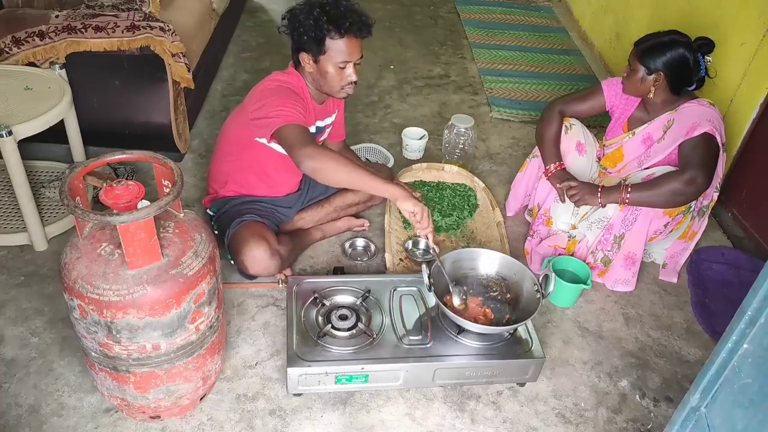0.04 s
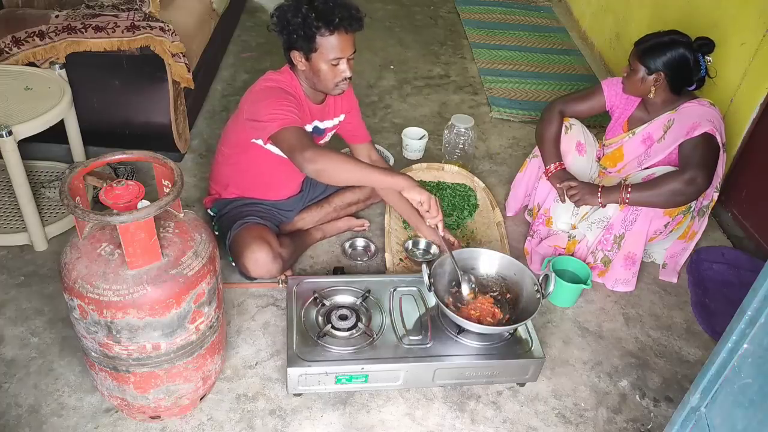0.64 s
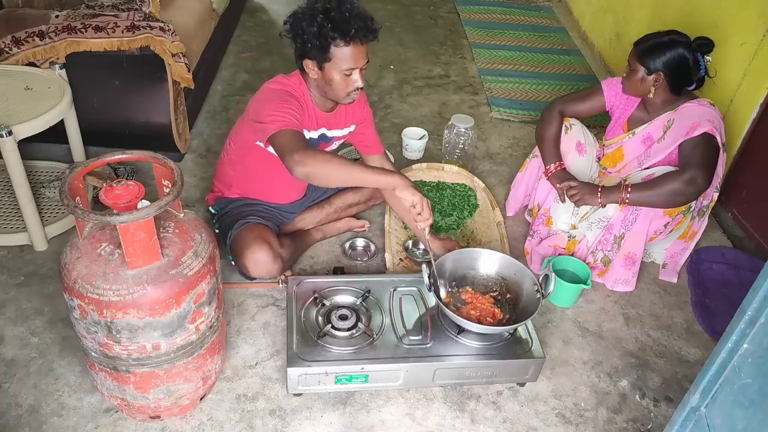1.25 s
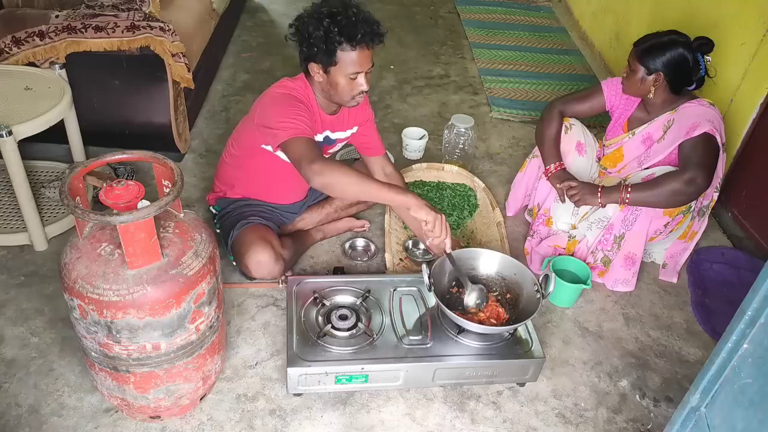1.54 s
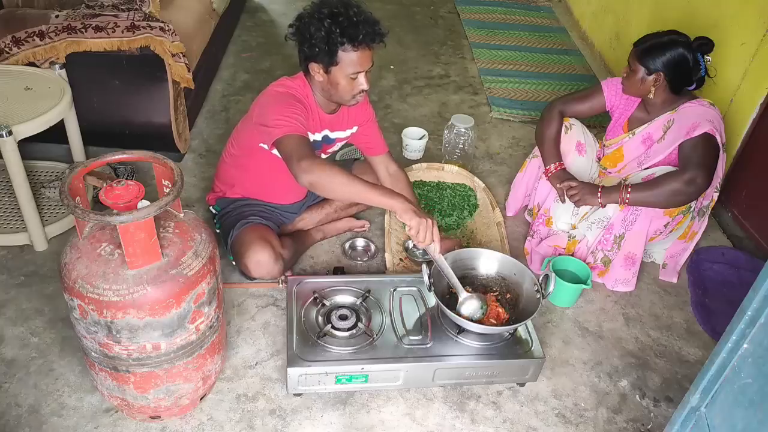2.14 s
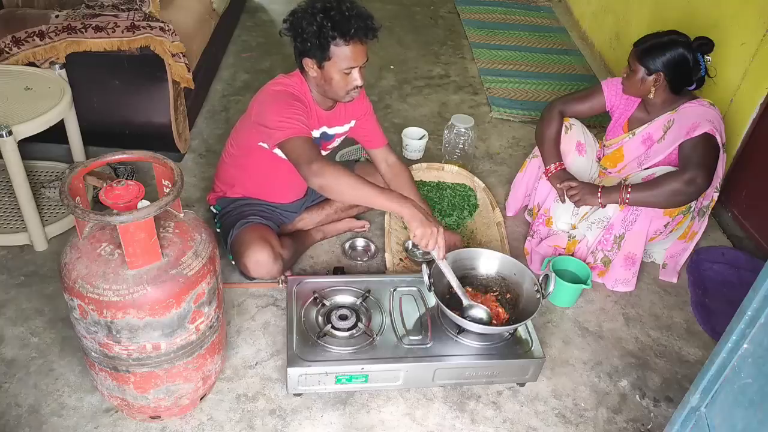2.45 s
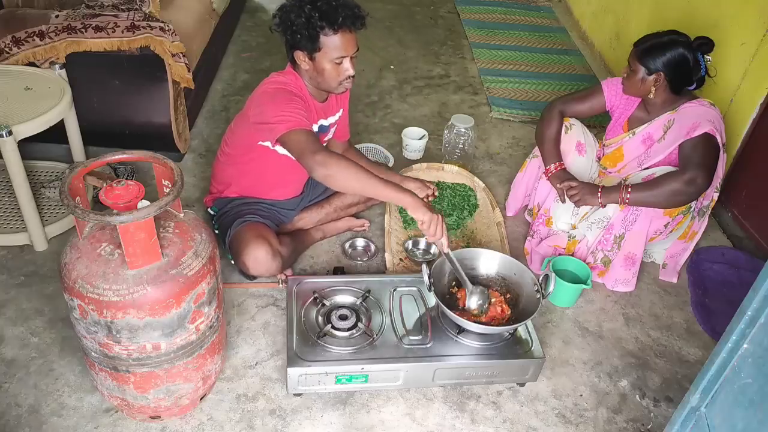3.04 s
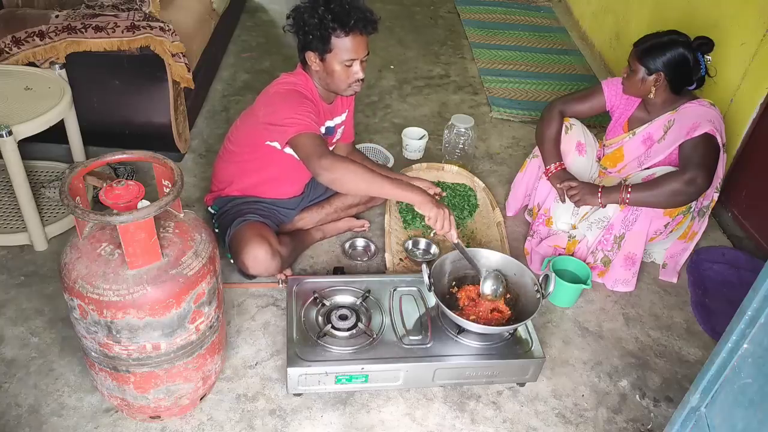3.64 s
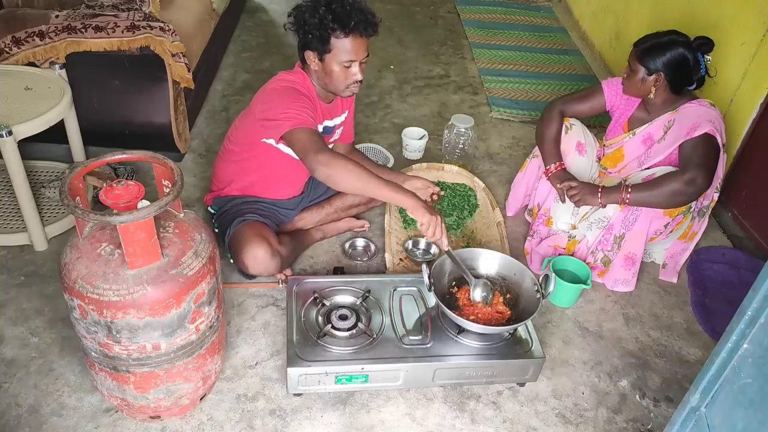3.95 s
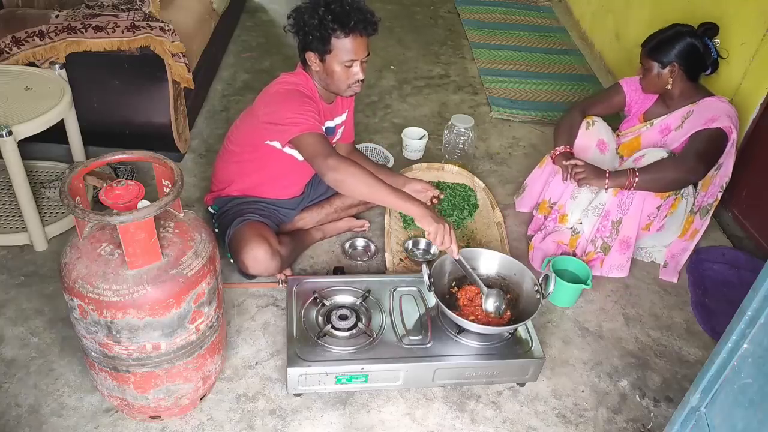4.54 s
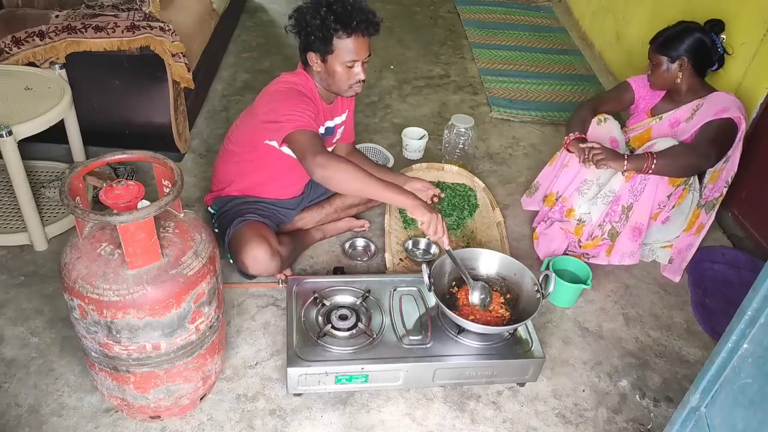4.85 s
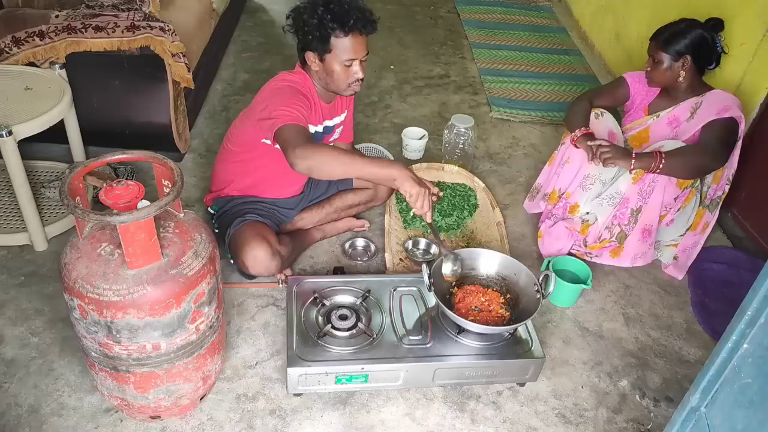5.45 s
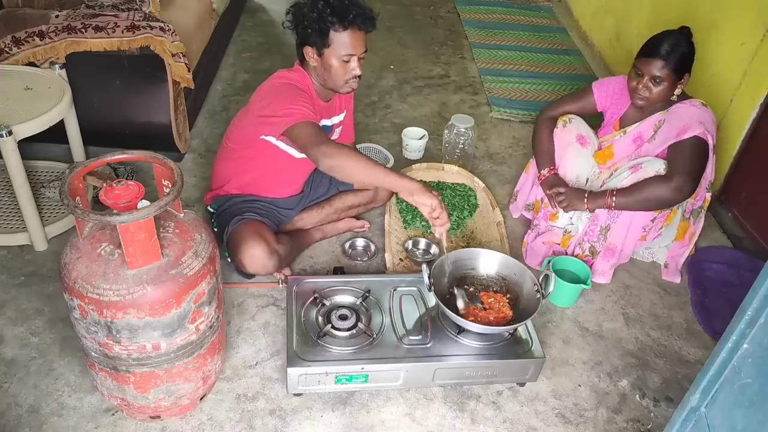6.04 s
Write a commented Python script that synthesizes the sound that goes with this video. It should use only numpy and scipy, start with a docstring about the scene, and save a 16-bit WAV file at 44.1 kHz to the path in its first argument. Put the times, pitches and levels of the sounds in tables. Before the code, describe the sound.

Heard from nearby in a bare room, chopped tomatoes sizzle softly in hot oil over the faint rumble and hiss of a gas burner. A few ringing ladle clanks and skids on the wok open the scene, with faint bird chirps outside. A run of duller chopping knocks and rubs follows while the frying grows louder. It ends with two sharp clanks and scrapes that make the light stove thump.

```python
"""A metal ladle clanks on a steel wok over the soft sizzle of chopped tomatoes, in a bare room.
Each clank rings the wok's modes, then the ladle skids down the wall, sticking and slipping.
Chops through the tomatoes knock more dully; the last two clanks also jolt the stove.
Water bursts out of the hot oil in tiny pops, swelling once the food is stirred.
Behind it the gas burner rumbles and hisses, and a far bird chirps."""
import sys
import numpy as np
from scipy import signal
from scipy.fft import rfft, irfft, next_fast_len
from scipy.io import wavfile

SR = 44100
rng = np.random.default_rng(int(sys.argv[2]) if len(sys.argv) > 2 else 0)


def bounce(signal):
    """Save signal as a 16-bit WAV file at the path given by the first command-line argument."""
    frames = np.transpose(np.atleast_2d(signal))
    limited = np.clip(frames, -1, 1)
    pcm = np.round(limited * 32767).astype(np.int16)
    wavfile.write(sys.argv[1], SR, pcm)


N = 277830

# ladle on bare steel:
# (time [s], level [dB], brightness [dB/oct], crack [dB], travel to the food [s], skid [dB])
CLANKS = [(0.092, -31, -1.47, -30, 0.1, -59), (0.380, -25.5, 0, -8, 0.17, -44),
          (1.275, -30, 1, -15, .23, -40.5), (5.5297, -21, 2.2, -14, .18, -37),
          (5.963, -22.5, 2, -13, .205, -37)]
# ladle through tomato: (time [s], level [dB], brightness [dB/oct], crack [dB])
CHOPS = [(2.842, -44.5, -1.5, -38), (3.131, -31.8, 0.64, -37), (3.350, -41.5, -1.1, -37),
         (3.565, -40.5, 0.5, -34), (3.980, -25, 1.3, -1), (4.193, -36.5, 0.5, -14.5), (4.408, -28, 2, -21),
         (4.605, -29.5, 1.35, -37), (4.828, -42.5, -3, -16.5)]
# gentle pushes through the food: (time [s], length [s], level [dB], brightness [dB/oct])
PUSHES = [(2.36, 0.19, -51.5, -7.5), (2.55, 0.041, -43.5, -0.5), (3.761, 0.067, -50.5, -5.5),
          (5.017, .063, -44, -6.5), (5.235, 0.069, -45, -3.5)]
# four registers of a blow: (low [Hz], high [Hz])
ZONES_HZ = [(150, 1000), (1000, 2500), (2500, 8500), (8500, 14000)]
# level offset per register: (body [dB], clang [dB], ring [dB], edge [dB])
CLANK_ZONES_DB = [-3, 4.5, 2.5, -4]
CHOP_ZONES_DB = [6.5, -0.5, 2.34, -6.5]
# distinct wok modes: (frequency [Hz], relative level [dB], t60 [s])
WOK_MODES = [(207, 0, .4), (241, -3, .35), (281, -4, .3), (307, 0, .4), (438, 0, .35), (578, 0, .35),
             (660, -4, .3), (711, -2, .35), (853, -3, .35), (955, -2, .35), (1088, -3, .3), (1294, -2, .3),
             (1385, -3, .28), (1563, -1, .26), (1761, -2, .3), (2035, -1, .26), (3050, -6, .25),
             (3600, -1, .3), (5520, -4, .22), (6228, -1, .25), (6995, -3, .26), (7243, -3, .3),
             (7590, -4, .22), (8521, 0, .25), (9108, 0, .22), (9450, -2, .18), (10480, -2, .2),
             (11303, 0, .22), (12100, -2, .2)]
# stove jolts: (time [s], level [dB])
THUMPS = [(5.532, -20), (5.964, -36)]
# spectral shapes: (frequency [Hz], relative level [dB])
CLANK_COLOUR = [(150, -24), (210, -12), (290, -5), (370, -9), (450, -5), (520, -9), (680, -3), (1100, -7),
                (1550, 2), (2000, 1), (2750, -12), (3650, -8), (4700, -12), (7400, -7), (9000, -14),
                (14000, -21)]
CHOP_COLOUR = [(150, -16), (205, -6), (295, -1), (370, -6), (440, 0), (520, -5), (600, 1), (780, -3),
               (1000, -2), (1600, -7), (2500, -11), (3500, -13), (4400, -19), (7400, -13), (9000, -20),
               (14000, -26)]
OIL_COLOUR = [(60, -54), (300, -2), (600, -2.5), (1000, 2), (1250, 4), (1700, 1.5), (2200, 5), (3600, 3),
              (5000, 1), (7400, 3.5), (8800, -2.5), (12000, 0), (14300, -4.5)]
FLAME_COLOUR = [(5, -2), (22, 1.5), (45, -13), (70, -13.5), (95, -14), (150, -20.5), (230, -25),
                (300, -22.5), (370, -29.5), (700, -28), (1000, -46.5), (2200, -35.5), (4500, -47),
                (10000, -75)]
# gas jet resonances: (frequency [Hz], width [Hz], level [dB])
JET_BANDS = [(7550, 130, -62), (7280, 200, -60), (3840, 610, -65.5)]
# bird: (time [s], length [s], start [Hz], end [Hz], level [dB])
CHIRPS = [(0.275, .06, 3250, 4400, -53), (0.315, .06, 4400, 4150, -55), (0.53, .07, 3700, 4300, -57),
          (1.02, .09, 6300, 5650, -61), (1.625, .09, 4750, 3200, -54)]
# left-right likeness: (frequency [Hz], correlation [-1..1])
WOK_LIKENESS = [(100, 0.52), (300, 1), (600, 0.17), (1100, 0.42), (2200, -0.28), (4500, -0.2), (8000, 0.37),
                (14000, 0.26)]
AIR_LIKENESS = [(60, 0.36), (300, 0.54), (650, 0.46), (1300, 0.031), (14000, -0.1)]
# stereo balance: (frequency [Hz], left minus right [dB])
BALANCE = [(60, 1), (150, -0.5), (300, 0.5), (650, -0.5), (1200, -2), (2300, 0), (4300, -1), (8000, -2),
           (14000, -0.1)]
# decay of the wok's crowded modes and of the room: (frequency [Hz], t60 [s])
PLATE_T60 = [(200, 0.16), (700, 0.086), (1700, 0.086), (4000, 0.096), (7500, 0.11), (14000, 0.076)]
ROOM_T60 = [(150, 0.53), (600, 0.75), (1800, 0.47), (4000, 0.5), (7500, 0.47), (14000, 0.21)]

RING_SAMPLES = 2 ** 15
RING_TIME_S, RING_BINS_HZ = np.arange(RING_SAMPLES) / SR, np.fft.rfftfreq(RING_SAMPLES, 1 / SR)
EDGES_HZ = 160 * 2 ** (np.arange(21) / 3)
CENTRES_HZ = np.sqrt(EDGES_HZ[1:] * EDGES_HZ[:-1])
BANK = [signal.butter(2, pair, "band", fs=SR, output="sos") for pair in zip(EDGES_HZ, EDGES_HZ[1:])]


def blows(table, colour, zones_db, room, modes, wet_db, chatter_s, chatter_db, t60_scale, patchy_db):
    """Ladle strikes wok: a crack, a short crash of crowded modes, clear modes ringing on."""
    out = np.zeros((2, N))
    plates = np.array([crowded_modes(np.array(PLATE_T60) * [1, t60_scale]) for _ in range(3)])
    octaves = np.log2(ZONES_HZ).mean(axis=1) - np.log2(ZONES_HZ).mean()
    ring_db, spread_db, crack_lag_s = -14, -3, .001087
    for time_s, level_db, brightness_db_oct, crack_db, *_ in table:
        # each spot excites another blend of modes
        plate = np.tensordot(rng.standard_normal(len(plates)), plates, 1)
        mode_gains = from_db(spread_db * rng.standard_normal(len(modes)))
        ring = np.tensordot(mode_gains * rng.choice([-1, 1], len(modes)), modes, 1)
        crash = signal.fftconvolve(plate, contact(chatter_s, chatter_db), axes=-1)[:, :RING_SAMPLES]
        crash = evened(in_room(crash, room, wet_db))
        crash = irfft(rfft(crash) * contact_spot(patchy_db))
        blow = unit_energy(crash) + from_db(ring_db) * unit_energy(ring)
        # less pulp under the ladle, brighter blow
        levels_db = level_db + np.array(zones_db) + brightness_db_oct * octaves
        add(out, time_s, weighted(radiated(blow, colour), levels_db))
        add(out, time_s + crack_lag_s, from_db(crack_db) * crack())
    return out


def contact(chatter_s, chatter_db, bounces=7):
    """Contact force: one touch, then the springy ladle chatters."""
    force = np.zeros(RING_SAMPLES // 16)
    jitter, strength = rng.random((bounces, 2)).T
    bounce_s = (np.arange(bounces) + 1 + jitter) / bounces * chatter_s
    at = np.minimum(bounce_s * SR, len(force) - 1).astype(int)
    force[0] = 1
    force[at] += from_db(chatter_db) * (2 * strength - 1)
    return force[None]


def contact_spot(patchy_db, width_hz=140, full_hz=4500):
    """Nodes and antinodes at the struck spot: spectral dips and humps, deeper in the treble."""
    humps = np.interp(RING_BINS_HZ / width_hz, np.arange(400), rng.standard_normal(400))
    return from_db(patchy_db * np.minimum(RING_BINS_HZ / full_hz, 1) ** .5 * humps)


def crack(hz=1400, decay_per_s=2200, overtone_gain=.092, left_lag_s=.00007):
    """First push of the steel: one sharp swing without bass."""
    t = np.maximum(np.arange(RING_SAMPLES // 64) / SR - np.array([[left_lag_s], [0]]), 0)
    phase = 2 * np.pi * hz * t
    swing = (np.sin(phase) + overtone_gain * np.sin(5 * phase)) * np.exp(-decay_per_s * t)
    return signal.sosfilt(signal.butter(2, 350, "high", fs=SR, output="sos"), swing)


def clear_modes():
    """Distinct wok modes: one decaying stereo sine each."""
    modes = []
    for hz, level_db, t60_s in WOK_MODES:
        ring = np.exp((2j * np.pi * hz - np.log(1000) / t60_s) * RING_TIME_S)
        modes.append(stereo(ring.imag, ring.real, hz, WOK_LIKENESS) * hz ** .13 * from_db(level_db))
    return np.array(modes)


def crowded_modes(t60_table):
    """Modes too close to resolve: noise, flat in energy, each third-octave with its own decay."""
    white, out = rng.standard_normal((2, 2, RING_SAMPLES)), 0
    for k, (sos, hz) in enumerate(zip(BANK, CENTRES_HZ)):
        decay = np.exp(-np.log(1000) * RING_TIME_S / at_hz(t60_table, hz))
        mid, side = signal.sosfilt(sos, white[k % 2] * decay)
        out = out + stereo(rms_one(mid), rms_one(side), hz, WOK_LIKENESS) * np.sqrt(hz)
    return unit_energy(out)


def radiated(sound, colour, cutoff_hz=180):
    """Coloured spectrum; the wok barely radiates below its lowest mode."""
    hz = RING_BINS_HZ + 1
    return rfft(sound, RING_SAMPLES) * from_db(at_hz(colour, hz)) / np.sqrt(1 + (cutoff_hz / hz) ** 20)


def weighted(spectrum, levels_db, span_s=.03):
    """Hardness and place of a blow set each register's energy, given as rms over span_s."""
    hz = RING_BINS_HZ + 1
    power = np.mean(np.abs(spectrum) ** 2, axis=0) * 2 / RING_SAMPLES / (span_s * SR)
    zone_power = [power[(hz > low) & (hz < high)].sum() for low, high in ZONES_HZ]
    gains_db = levels_db - 10 * np.log10(zone_power)
    corners_hz = np.array(ZONES_HZ) * [1.2, 1 / 1.2]
    curve_db = np.interp(np.log(hz), np.log(corners_hz.ravel()), np.repeat(gains_db, 2))
    fade = np.clip(np.linspace(10, -2, RING_SAMPLES), 0, 1)
    return irfft(spectrum * from_db(curve_db)) * fade


def slides(strokes, room, modes, modes_db, rasp_db, slips_per_s=700, uneven_db=3.5):
    """The ladle's edge sticks and slips, rasping in one resonance; pulp dulls it. Rows as PUSHES."""
    out = np.zeros((2, N))
    rasp_hz, width_hz = 3650, 220
    wok = evened(in_room(crowded_modes(PLATE_T60), room, wet_db=-6))
    wok += from_db(modes_db) * unit_energy(modes.sum(0))
    resonance = from_db(rasp_db / (1 + ((RING_BINS_HZ - rasp_hz) / width_hz) ** 2))
    response = radiated(wok, CHOP_COLOUR) * resonance
    octaves = np.log2(np.maximum(RING_BINS_HZ, WOK_MODES[0][0]))
    for time_s, length_s, level_db, brightness_db_oct in strokes:
        envelope = np.sqrt(np.abs(np.sin(np.pi * np.minimum(RING_TIME_S / length_s, 1))))
        slipping = rng.random(RING_SAMPLES) < slips_per_s / SR
        slips = slipping * from_db(uneven_db * rng.standard_normal(RING_SAMPLES)) * envelope
        spectrum = rfft(evened(slips[None])) * response * from_db(brightness_db_oct * octaves)
        rasp = irfft(spectrum)[:, :RING_SAMPLES * 3 // 4]
        add(out, time_s, unit_energy(rasp) * np.sqrt(length_s * SR) * from_db(level_db))
    return out


def skid_strokes(length_s=.1, brightness_db_oct=1.5):
    """After a clank the ladle skids the last stretch of bare wall."""
    return [(time_s + travel_s - length_s, length_s, skid_db, brightness_db_oct)
            for time_s, *_, travel_s, skid_db in CLANKS]


def landing_strokes(length_s=.033, offset_db=-5, brightness_db_oct=-.5):
    """Each skid ends in a dull rub against the food."""
    return [(time_s + travel_s - length_s, length_s, skid_db + offset_db, brightness_db_oct)
            for time_s, *_, travel_s, skid_db in CLANKS]


def drag_strokes(delay_s=.077, length_s=.03, level_db=-47.5, brightness_db_oct=-5.5):
    """After a chop the edge drags through the pulp."""
    return [(time_s + delay_s, length_s, level_db, brightness_db_oct) for time_s, *_ in CHOPS]


def stove_thumps(right_db=-9):
    """The light stove rocks on its feet; its sheet-metal top booms."""
    out, t = np.zeros((2, N)), RING_TIME_S
    # (frequency [Hz], relative level [dB], t60 [s])
    frame, knock, panel = (30, 0, .24), (56, -3, .081), (118, -10, .048)
    boom = sum(np.sin(2 * np.pi * hz * t) * from_db(db - 60 * t / t60_s)
               for hz, db, t60_s in (frame, knock, panel))
    for time_s, level_db in THUMPS:
        add(out, time_s, boom * from_db(level_db + np.array([[0], [right_db]])))
    return out


def sizzle(peak_pops_per_s=5000, size_db=-3, pops_db=-3, flicker_db=.7):
    """Water bursts out of hot oil: tiny pops over a fine spray, denser when stirred."""
    level = from_db(frying_db())
    popping = rng.random((2, N)) < peak_pops_per_s * level / level.max() / SR
    pops = popping * rng.standard_normal((2, N))
    pops *= from_db(size_db * np.minimum(rng.exponential(1, N), 5))
    spray = rng.standard_normal((2, N))
    frying = coloured(spray + from_db(pops_db) * rms_one(pops), OIL_COLOUR)
    return level * from_db(flicker_db * drift(rate_hz=22)) * frying


def frying_db(rest_db=-52, earlier_stir_db=4, settle_s=.98, stir_at_s=1.96, swell_db=9, swell_s=.85):
    """Frying settles at rest, then swells as stirring brings wet food onto hot steel."""
    t = np.arange(N) / SR
    stirred = 1 - np.exp(-np.maximum(t - stir_at_s, 0) / swell_s)
    return rest_db + earlier_stir_db * np.exp(-t / settle_s) + swell_db * stirred


def burner(flame_db=-51, jet_pan_db=3):
    """The flame rumbles; the gas jet hisses in narrow resonances, to the right."""
    out = from_db(flame_db) * coloured(rng.standard_normal((2, N)), FLAME_COLOUR)
    for hz, width_hz, level_db in JET_BANDS:
        hiss = signal.lfilter(*signal.iirpeak(hz, hz / width_hz, fs=SR), rng.standard_normal((2, N)))
        out += rms_one(hiss) * from_db(level_db + jet_pan_db * np.array([[-1], [1]]))
    return out


def bird(room):
    """Thin gliding chirps from outside, blurred by the room."""
    out, waver = np.zeros((2, N)), 1 + .012 * drift(rate_hz=90)
    for time_s, length_s, start_hz, end_hz, level_db in CHIRPS:
        along = np.linspace(0, 1, int(length_s * SR))
        pitch_hz = (start_hz + (end_hz - start_hz) * along) * waver[int(time_s * SR):][:len(along)]
        tone = np.sin(2 * np.pi * np.cumsum(pitch_hz) / SR)
        add(out, time_s, from_db(level_db) * np.sin(np.pi * along) * tone)
    return in_room(out, room, wet_db=-2)


def bare_room(first_wall_s=.01):
    """Room response: wall reflections build up, then decay."""
    build_up = 1 - np.exp(-(RING_TIME_S / first_wall_s) ** 2)
    return unit_energy(crowded_modes(ROOM_T60) * build_up)


def in_room(x, room, wet_db):
    """Direct sound plus reverberation."""
    return x + from_db(wet_db) * signal.fftconvolve(x, room, axes=-1)[:, :x.shape[-1]]


def evened(x):
    """Flatten broad spectral humps, keep fine peaks."""
    spectrum, k = rfft(x), np.arange(RING_SAMPLES // 2 + 1)
    total = np.cumsum(np.mean(np.abs(spectrum) ** 2, axis=0))
    reach = k // 12 + 20
    low, high = np.maximum(k - reach, 0), np.minimum(k + reach, k[-1])
    power = (total[high] - total[low]) / (high - low)
    return unit_energy(irfft(spectrum / np.sqrt(power + power.mean() / 20)))


def coloured(pair, colour):
    """Two unrelated noises to coloured stereo, rms 1."""
    size = next_fast_len(pair.shape[-1])
    hz = np.fft.rfftfreq(size, 1 / SR) + 1
    spectrum = stereo(*rfft(pair, size), hz, AIR_LIKENESS) * from_db(at_hz(colour, hz))
    return rms_one(irfft(spectrum, size)[:, :pair.shape[-1]])


def stereo(mid, side, hz, likeness):
    """Two unrelated signals to left and right."""
    alike, sign = np.clip(at_hz(likeness, hz), -1, 1), np.array([[1], [-1]])
    pair = np.sqrt(1 + alike) * mid + np.sqrt(1 - alike) * side * sign
    return pair * from_db(sign * at_hz(BALANCE, hz) / 2)


def drift(rate_hz):
    """Slow random wander, rms 1."""
    hop, run_in = 40, 2000
    pole = np.exp(-2 * np.pi * rate_hz * hop / SR)
    white = rng.standard_normal(N // hop + run_in + 2)
    slow = signal.lfilter([1], [1, -2 * pole, pole * pole], white)[run_in:]
    return np.interp(np.arange(N) / hop, np.arange(len(slow)), rms_one(slow))


def from_db(db):
    """Decibels to gain."""
    return 10 ** (np.asarray(db) / 20)


def rms_one(x):
    """Scale to rms 1."""
    return x / np.sqrt(np.mean(x ** 2) + 1e-20)


def unit_energy(x):
    """Scale to mean energy 1 per channel."""
    return rms_one(x) / np.sqrt(x.shape[-1])


def at_hz(table, hz):
    """Read a table on a log-frequency axis."""
    points_hz, values = np.array(table).T
    return np.interp(np.log(hz), np.log(points_hz), values)


def add(out, time_s, sound):
    """Mix a sound in at time_s."""
    start = max(round(time_s * SR), 0)
    out[:, start:start + sound.shape[-1]] += sound[..., :N - start]


def scene():
    """Ladle, stove, frying and bird in one room."""
    modes, room = clear_modes(), bare_room()
    clanks = blows(CLANKS, CLANK_COLOUR, CLANK_ZONES_DB, room, modes,
                   wet_db=-6, chatter_s=.006, chatter_db=-10, t60_scale=.86, patchy_db=3.5)
    chops = blows(CHOPS, CHOP_COLOUR, CHOP_ZONES_DB, room, modes,
                  wet_db=-8.5, chatter_s=.0051, chatter_db=-12, t60_scale=1.21, patchy_db=5.5)
    skids = slides(skid_strokes(), room, modes, modes_db=-24, rasp_db=8.5)
    rubs = slides(landing_strokes() + drag_strokes(), room, modes, modes_db=-10.5, rasp_db=6)
    pushes = slides(PUSHES, room, modes, modes_db=-4, rasp_db=7)
    return clanks + chops + skids + rubs + pushes + stove_thumps() + sizzle() + burner() + bird(room)


def record(dry):
    """Soft clip, then a steep treble cut."""
    cutoff_hz = 14300
    return signal.sosfilt(signal.ellip(12, .2, 70, cutoff_hz, fs=SR, output="sos"), np.tanh(dry))


dry = scene()
out = record(dry)
bounce(out)
```